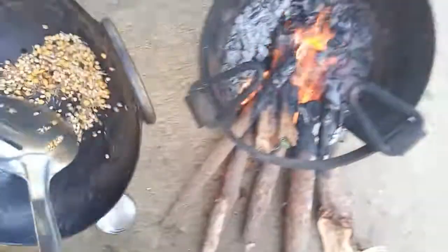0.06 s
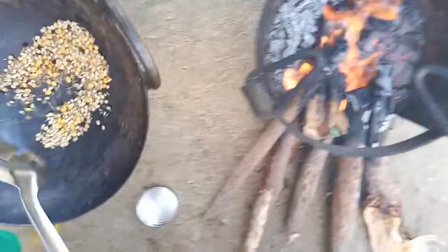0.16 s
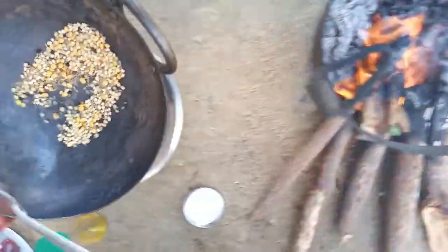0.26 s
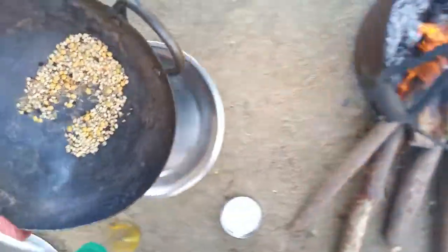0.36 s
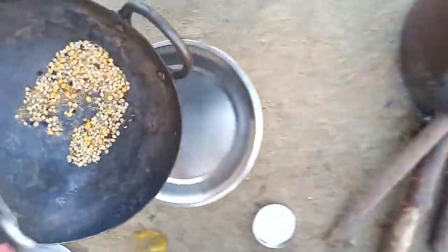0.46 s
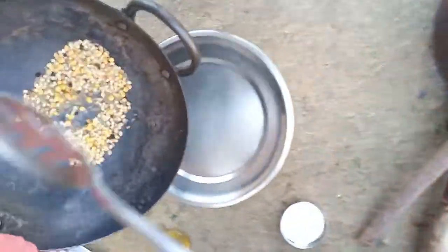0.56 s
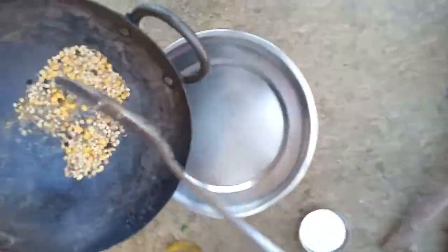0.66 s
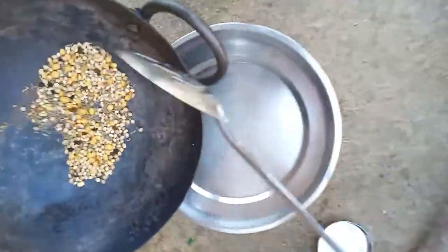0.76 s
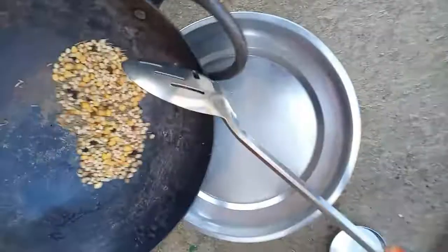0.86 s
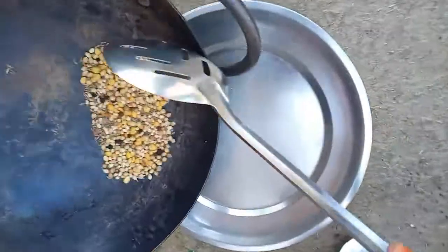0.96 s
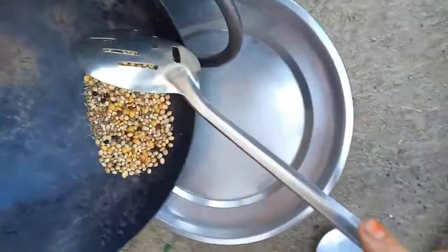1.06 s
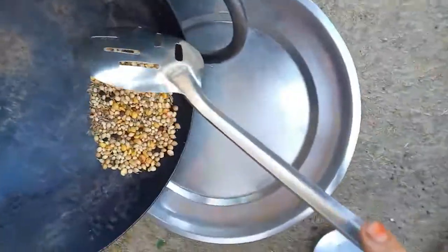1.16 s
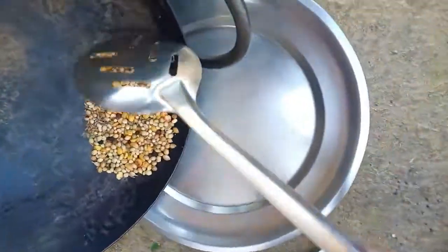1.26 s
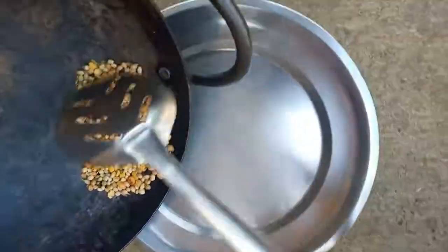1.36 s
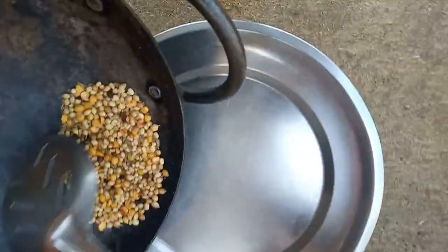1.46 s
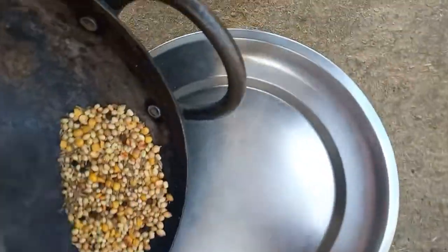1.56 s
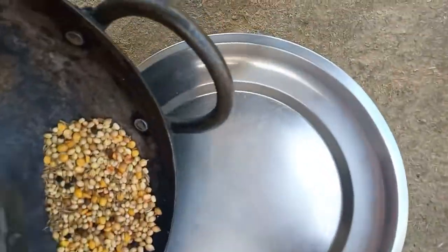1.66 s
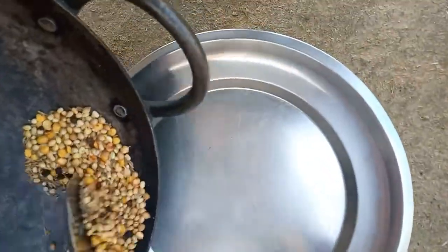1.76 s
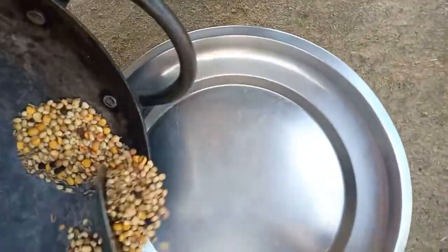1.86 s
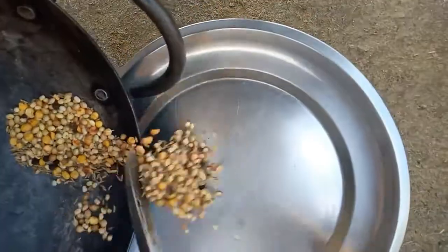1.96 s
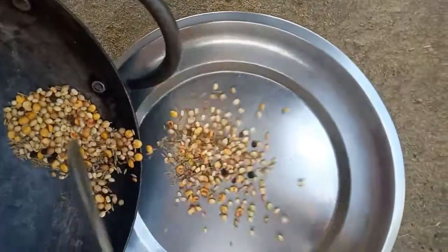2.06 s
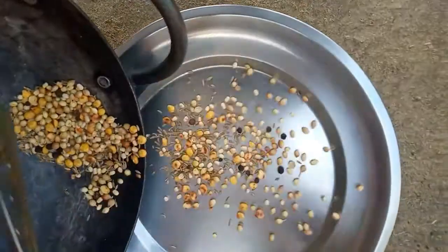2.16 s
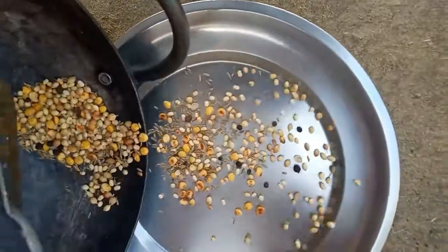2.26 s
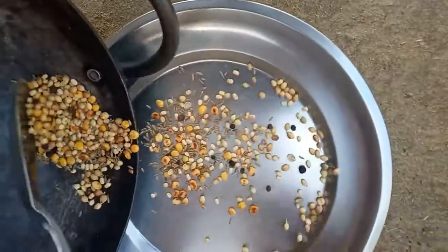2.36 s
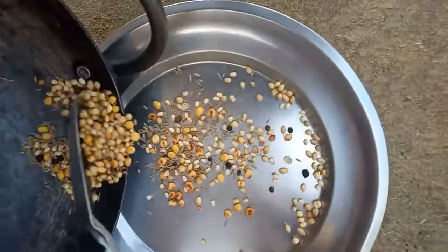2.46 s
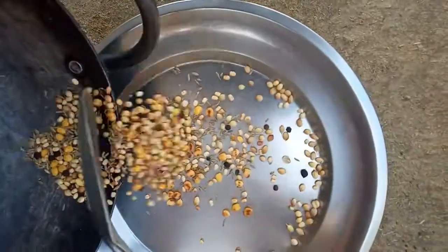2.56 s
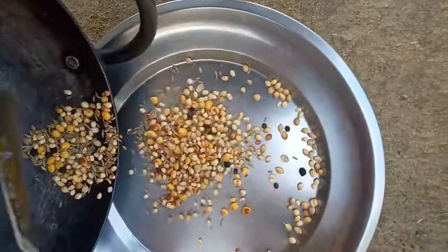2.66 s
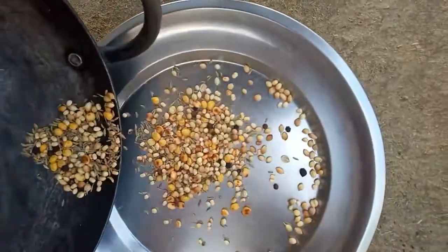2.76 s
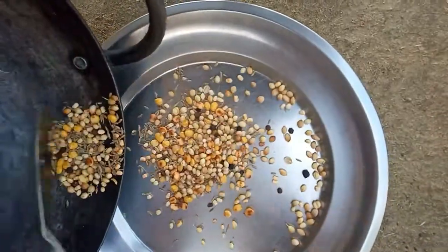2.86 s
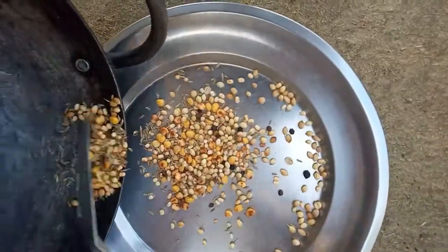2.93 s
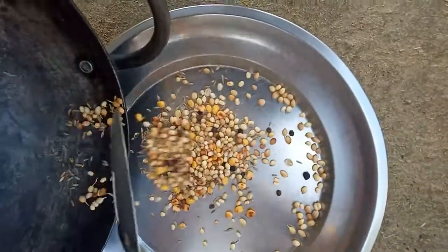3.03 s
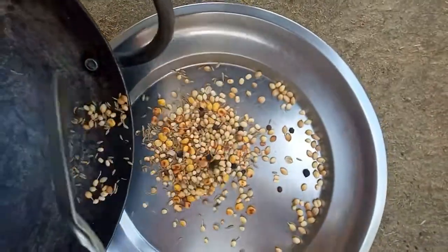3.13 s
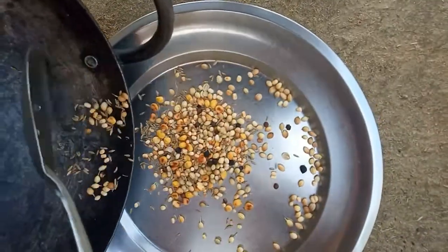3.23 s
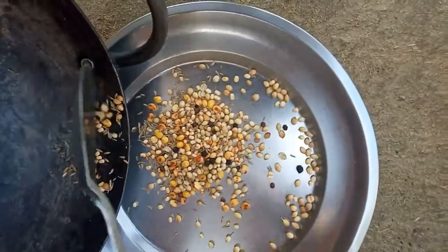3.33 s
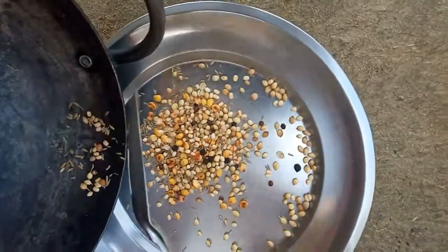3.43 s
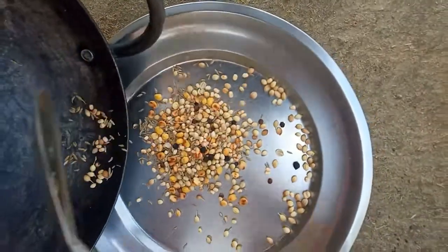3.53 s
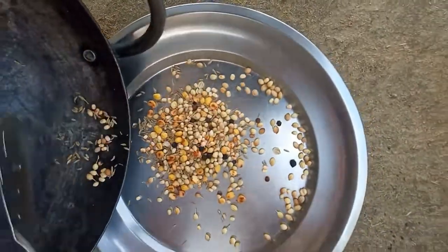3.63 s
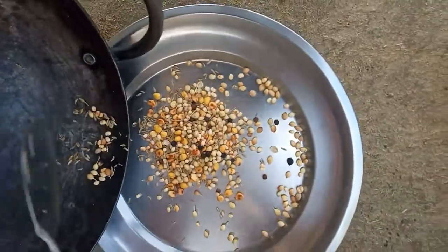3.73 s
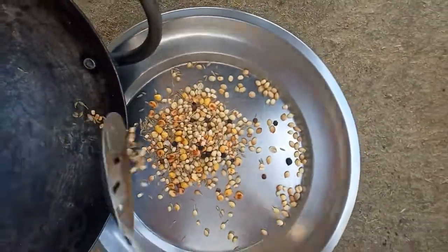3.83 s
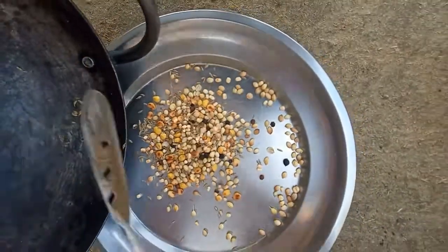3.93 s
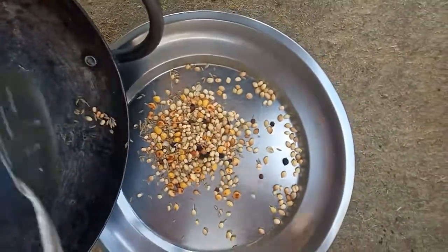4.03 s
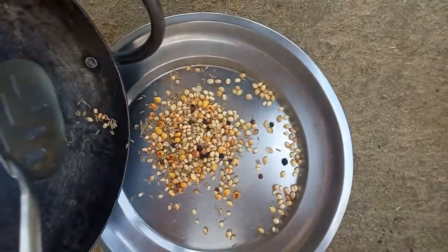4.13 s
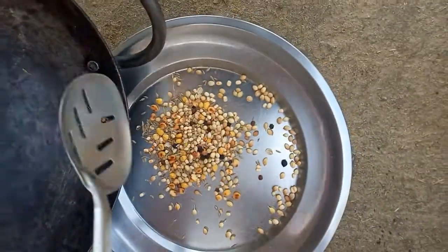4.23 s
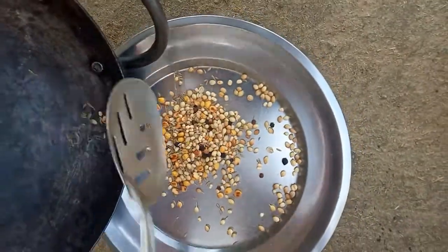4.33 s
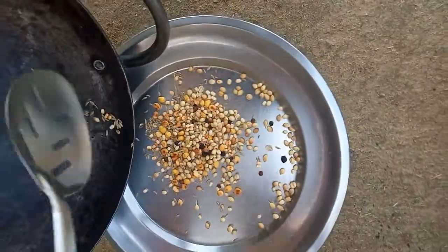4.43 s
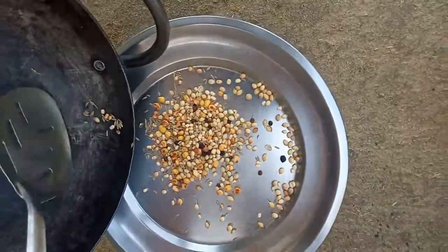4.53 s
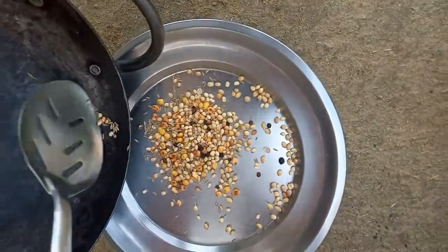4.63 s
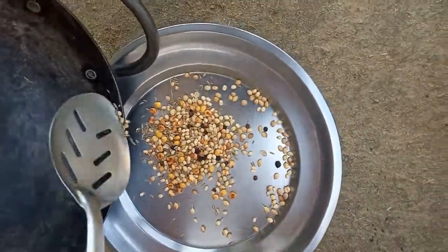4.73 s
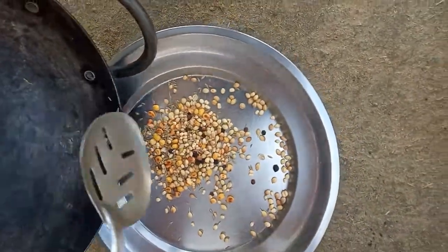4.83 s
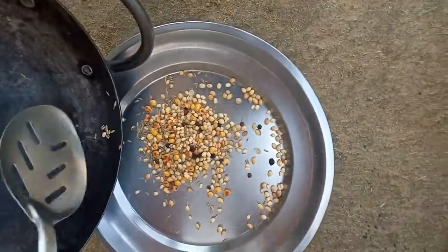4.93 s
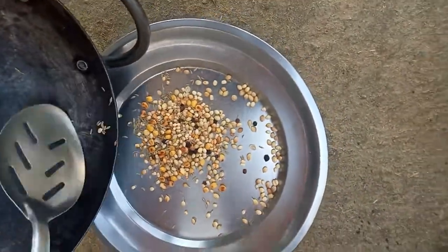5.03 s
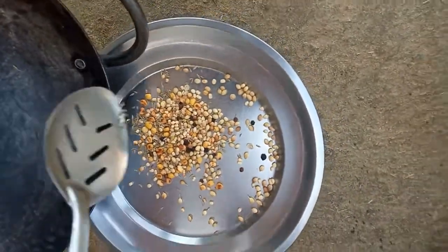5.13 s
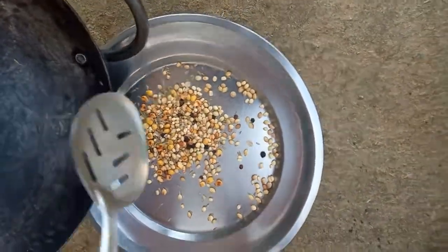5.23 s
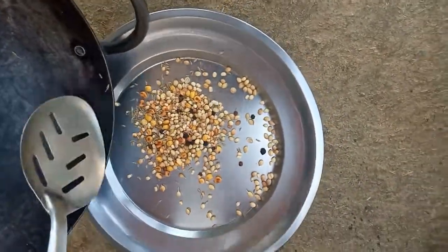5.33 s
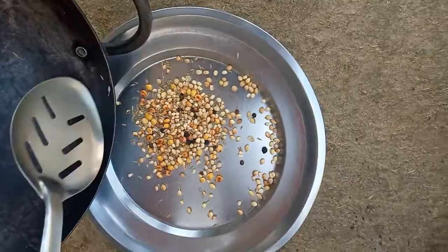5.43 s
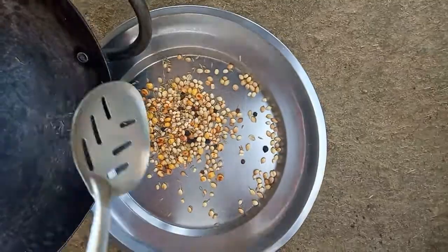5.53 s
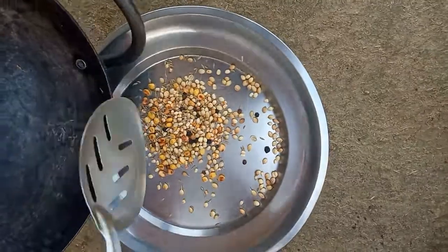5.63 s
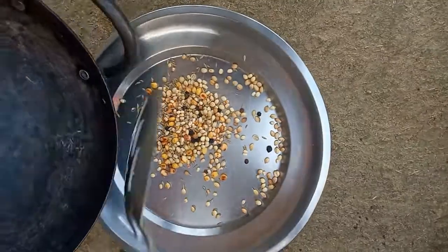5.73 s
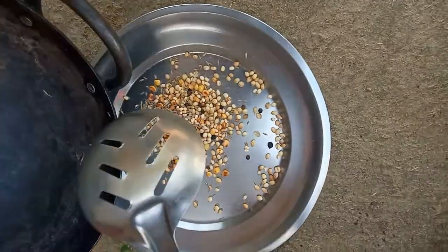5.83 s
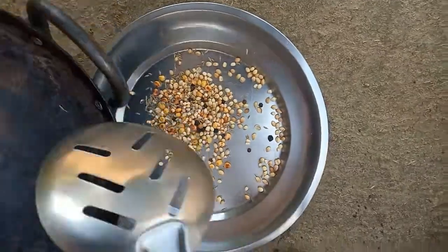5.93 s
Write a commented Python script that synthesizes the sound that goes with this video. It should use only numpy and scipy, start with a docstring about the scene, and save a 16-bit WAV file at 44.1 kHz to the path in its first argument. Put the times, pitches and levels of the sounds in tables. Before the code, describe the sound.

Soft seed sliding, then repeated metallic clanks and rising scrapes of a steel spatula on an iron pan, with seeds showering onto steel.

```python
"""First, seeds slide softly about in a tilted iron pan outdoors, over quiet air, and single seeds tick.
Then a slotted steel spatula pushes the roasted seeds into a steel plate, stroke after stroke.
In a full stroke the blade clatters down, scrapes and judders towards the rim, then leaves it and rings.
Random tiny impacts drive resonances for scrapes and seeds; decaying sine waves make the free ringing.
A few showers of seeds patter into the plate; other seeds shift in the pan after the strokes."""
import sys
import numpy as np
from scipy import signal
from scipy.fft import rfft, irfft
from scipy.io import wavfile
from scipy.ndimage import uniform_filter1d, map_coordinates

SR = 44100
rng = np.random.default_rng(int(sys.argv[2]) if len(sys.argv) > 2 else 0)


def unload_audio(sound):
    """Save the sound as a 16-bit wav file, at the path given as the first command line argument."""
    columns = np.transpose(np.atleast_2d(sound))
    # keep every value between -1 and 1, then stretch to whole-number steps
    steps = np.round(np.clip(columns, -1, 1) * 32767)
    wavfile.write(sys.argv[1], SR, steps.astype(np.int16))


N = 264159
TIME = np.arange(N) / SR  # [s]

# Levels in the tables are settings; the functions add fixed trims to some of them.
# The blade lands: (time [s], clatter length [s], pan thud [dB], pan knock [dB], judder [dB], crack [dB],
#   low tone [dB], high tone [dB], overtones [dB], overtone tilt [dB per octave])
STRIKES = [(1.543, 0.0084, -29, -23.5, -31, -29, -35, -25, -28, -16.5),
           (2.335, .0026, -26.5, -29, -24, -29, -21.5, -32, -31.5, -3.5),
           (2.7945, 0.0054, -23, -21.5, -20, -32, -19.5, -31.5, -31.5, -3.5),
           (3.2421, 0.0065, -20.5, -26, -30, -26.5, -27, -18.5, -32.5, -9),
           (3.684, 0.012, -23, -16, -17.5, -20.5, -24.5, -25.5, -29.5, -4.5),
           (4.116, 0.0088, -28.5, -20, -22, -33, -32, -28, -27, -4),
           (4.5509, .013, -28.5, -25, -17, -26, -33.5, -24, -34, 3.5),
           (4.989, 0.017, -25.5, -25, -16, -26.5, -33.5, -29.5, -38.5, 10),
           (5.3572, 0.01, -47.5, -37, -13, -27, -30, -40, -35, -8)]
# The blade skips off or leaves the iron and rings freely:
#   (time [s], low tone [dB], high tone [dB], overtones [dB], overtone tilt [dB per octave])
LIFTOFFS = [(0.738, -43, -59, -64, -17), (1.138, -73, -59, -59, 13), (1.72, -31, -26, -34, 4.5),
            (2.407, -31.5, -38, -35.5, 3), (2.953, -46, -42, -46.5, 8), (3.406, -47, -42, -43, 4),
            (3.867, -33, -38, -41.5, 6), (4.291, -47.5, -43, -43.5, -1.5), (4.768, -32.5, -44, -47, -1.5),
            (5.14, -48.5, -58.5, -42, 1.5), (5.502, -28.5, -52, -39, 1.5)]
# A push, lasting until the next lift-off: (start [s], hardest moment [share of the push], hiss [dB],
#   rumble [dB], judder at start [dB], judder at end [dB], judder pitch at start [Hz],
#   song at start [dB], song at end [dB], song's sag midway [dB], flick at the rim [dB])
SCRAPES = [(0.854, 0.37, -45, -56, -25, -70, 1596, -22, -45.5, -1, -61),
           (1.563, 0.69, -40.5, -33.5, -46, -47, 1779, -15.5, -11, 2, -40),
           (2.354, 0.55, -39, -31.5, -31, -22, 1689, -21, -11.5, -3.5, -38),
           (2.815, 0.15, -36, -33.5, -19, -30, 1566, -17.5, -22.5, -7, -34.5),
           (3.266, 0.66, -29, -35.5, -37, -12.5, 1557, -13.5, -14.5, 2, -48),
           (3.711, 0.54, -30.5, -34, -35, -17.5, 1613, -15.5, -11, 5.5, -40),
           (4.142, 0.52, -27, -35.5, -42, -13, 1552, -25, -17, 5, -36),
           (4.576, 0.4, -30.5, -36, -31.5, -15, 1501, -22, -16, 6, -34),
           (5.021, 0.67, -29.5, -43.5, -42, -11.5, 1774, -24, -17, 5, -31),
           (5.384, 0.91, -33, -44.5, -38, -8.5, 1786, -33, -9, 7.5, -45)]
# Light touches of the blade: (time [s], level [dB])
TOUCHES = [(0.8443, -23), (0.854, -32), (1.3752, -39.5), (2.28, -27.5)]
# The pan's rim sings on after the blade slips off it: (time [s], level [dB])
RIM_SLIPS = [(3.406, -43), (3.869, -38.5), (4.768, -56), (5.143, -49.5), (5.505, -54)]
# Seeds pour into the plate:
#   (time [s], rise [s], hold [s], fall [dB per s], clicks [dB], plate ring relative to clicks [dB])
SHOWERS = [(1.891, 0.069, 0.043, 101, -19.5, 5.5), (2.502, 0.13, 0.023, 193, -24, -12),
           (3.045, 0.022, 0.034, 249, -33, -30)]
# Seeds slide in the tilted pan: (time [s], rise [s], hold [s], fall [dB per s], level [dB])
SLIDES = [(0, 0.0013, 0.18, 48, -37), (0.44, 0.32, 0.091, 250, -37), (1.187, 0.2, 0.23, 300, -42.5),
          (2.275, 0.0067, 0.0078, 399.5, -37)]
# Stray single seeds: (time [s], level [dB])
STRAYS = [(0.0683, -41), (0.3935, -43), (1.2524, -44), (1.908, -13), (2.1239, -15.5), (2.541, -18),
          (2.719, -23), (3.185, -30.5), (3.9238, -25.5), (3.9479, -21), (4.897, -37), (5.2317, -25),
          (5.633, -38)]
# One dry knock close to the microphone: (time [s], level [dB])
KNOCK = (.5122, -23)

# Tones of the spatula in six families; t60 is the time to fade by 60 dB when undamped:
#   (frequency [Hz], level [dB], t60 [s])
SPATULA_MODES = [
    [(2575, 0, .25)],
    [(2800, -9, .1), (2919, 1.5, .19), (3160, 2.5, .19), (3185, -3, .14), (3262, -8, .1)],
    [(3505, -6.5, 0.082), (3830, 1, 0.4), (3617, 4, 0.13), (3800, -8, 0.51)],
    [(4020, 0, .3), (4072, -12, .3), (4127, -9, .14)],
    [(4298, -9, .22), (4465, 0, .16), (4587, -1, .17), (4727, -7, .12), (4918, -5, .15), (5108, -8, .2),
     (5303, -8, .22), (5368, -5, .17)],
    [(6130, -5.5, .12), (6690, -0.5, 0.25), (7155, -4.5, 0.094), (7430, -4.5, 0.13), (7600, -2.5, .25),
     (7600, -9, 0.14), (7700, -9.5, 0.14), (8060, -1.5, 0.23), (8440, -13, 0.086), (9340, -11.5, .13)],
]
# Long-lived tones of the pan's rim: (frequency [Hz], level [dB], t60 [s])
RIM_MODES = [(1249, -14, .6), (1782, -12, .9), (3590, -1, .8), (7572, 0, .7), (8158, -14, .8)]
# Resonances of the iron pan: (frequency [Hz], width [Hz], level [dB])
PAN_MODES = [(291, 53, 0), (359, 65, 1), (445, 60, 2), (521, 40, 4), (614, 65, 1.5), (676, 78, 0.5),
             (790, 157, 2), (972, 210, -0.5)]
# The whole pan rocking in the hand, and its wall: (frequency [Hz], width [Hz], level [dB])
PAN_ROCK_MODES = [(76.8, 122, 1.5), (145, 109, 6), (200, 110, -5)]
# The bowl of the pan under sliding seeds: (frequency [Hz], width [Hz], level [dB])
BOWL_MODES = [(2940, 55, -1), (3146, 33, 8), (3580, 29, 3.5), (3870, 41, 3), (4580, 130, 2.5)]
# Resonances of the steel plate: (frequency [Hz], width [Hz], level [dB])
PLATE_MODES = [(1090, 28, -2), (1500, 60, -7), (1783, 36, 2), (2120, 27, -1), (2660, 50, -10),
               (3180, 27, -2), (3698, 28, 0), (3832, 15, -2), (3960, 20, -7), (4390, 37, -5),
               (5030, 34, -9)]

# Colours, meaning how strong each pitch region is: (frequency [Hz], level [dB])
# Crack of the blade landing: (frequency [Hz], level [dB])
CRACK_COLOUR = [(300, -3.5), (1000, 6), (2200, 4), (3600, -13), (5000, -23), (6000, -13), (7600, -13),
                (9200, -27.5), (14500, -23), (16000, -24.5)]
# Hiss of the scraping edge: (frequency [Hz], level [dB])
FRICTION_COLOUR = [(300, 14), (1200, 1.5), (2200, 7), (4500, 3.5), (6000, 0.5), (7600, 10), (8400, -1.5),
                   (9500, -9), (12000, -9), (15000, -13.5), (16000, -52)]
# Seeds clicking on steel: (frequency [Hz], level [dB])
PATTER_COLOUR = [(120, -18), (200, -11.5), (340, -2.5), (916, -4.5), (1080, -3), (1180, -16), (1810, 1.5),
                 (2020, -23), (2130, -12), (2510, -14), (3830, -11), (5230, -12.5), (5630, -27),
                 (7680, -20.5), (16000, -58)]
# The hardest kernels ticking: (frequency [Hz], level [dB])
TICK_COLOUR = [(1500, 5), (4000, 5), (6000, -5.5), (8000, -4), (10000, -17.5), (14500, -7.5), (16000, -23)]
# Seeds sliding in the pan: (frequency [Hz], level [dB])
SLIDE_COLOUR = [(300, -7), (1500, -23), (2500, 1), (3200, 4), (4000, 9), (5000, -6), (5800, -14),
                (7500, -13.5), (9500, -27.5), (15000, -51)]
# Seeds shifting after a stroke: (frequency [Hz], level [dB])
RUSTLE_COLOUR = [(200, -5.5), (500, -21), (1800, 8.5), (4600, 3.5), (6000, -8.5), (7600, -2), (9500, -13.5),
                 (15000, -13)]
# Quiet outdoor air: (frequency [Hz], level [dB])
AIR_COLOUR = [(15, -60), (25, -15.5), (161, 0), (256, -6), (309, -9), (451, -9), (607, -10), (796, -12.5),
              (1160, -14.5), (1440, -13.5), (1650, -14.5), (2000, -14.5), (2160, -18.5), (3620, -23.5),
              (16000, -87)]

# Balance of the four overtone families, low to high, when struck: (level [dB])
STRUCK_BALANCE_DB = [-1, 0.5, 3, -3]
# The same balance when ringing freely: (level [dB])
FREE_BALANCE_DB = [2, -2.5, -5, -13.5]

# Friction swells and ebbs around the hardest moment: width [share of the push] and depth [dB]
HISS_WIDTH, HISS_DEPTH_DB = 0.25, 17
RUMBLE_WIDTH, RUMBLE_DEPTH_DB = 0.56, 13.5
JUDDER_BULGE_DB = 5  # extra judder midway
RIM_JUDDER_HZ, GLIDE_POWER = 1541, 2.4  # pitch at the rim; a higher power glides later
FLICK_S, FLICK_JUDDER_DB = 0.0063, 18.5  # the edge drags over the rim: fade time, extra judder
BITE_S, LET_GO_S = 0.015, 0.0061  # the edge takes hold and lets go
SETTLE_DB, EMPTYING_DB_PER_S = -43.5, 8.5  # seeds shift more faintly as the pan empties
SETTLE_RISE_S, SETTLE_HOLD_S, SETTLE_FALL_DB_PER_S = 0.01, 0.12, 74.5
TICKS_PER_S, TICKS_DB = 630, -10.5
AIR_DB = -46
CUTOFF_HZ = 15900


def scrapes():
    """The edge catches on rough iron; the catches hiss, rumble in the pan and sing in the blade."""
    hiss_gain, rumble_gain, judder_gain, song_gain = pushes()
    catches = evened(grains(2200, spread_db=4.5), span_s=0.058)

    rasp = gliding(metallic(catches, t60_s=0.11, ring_db=6, count=60), follow=.25)
    hiss = rms_one(tinted(rasp, FRICTION_COLOUR)) * from_db(5.5) * hiss_gain

    pan_sound = resonate(catches, PAN_MODES + PAN_ROCK_MODES)
    rumble_colour = [(60, -8.0), (250, -10), (500, 0.5), (1100, -3.5), (2500, 14.0)]
    rumble = evened(tinted(pan_sound, rumble_colour), span_s=0.016)
    rumble = rumble * from_db(1.66) * rumble_gain

    chatter = rms_one(gliding(resonate(catches, [(1925, 150, 0)]), follow=.5))
    shake = judder(width_hz=180, slips_per_s=1400) * from_db(-6.5) + from_db(-15) * chatter
    shake = shake * judder_gain * grip(rate_hz=30, depth_db=4.5)

    grind_colour = [(900, 4.5), (2200, 8), (3200, -5.5), (4500, -6.0), (5800, 5), (9000, -45.5)]
    grind = rms_one(tinted(rasp, grind_colour))
    song = from_db(-6.5) * blade_song(catches, contact_hz=5.7) + from_db(-20) * grind
    song = song * song_gain

    out = (hiss + rumble + shake + song) * grip(rate_hz=22, depth_db=3.0)
    for s, *ring_db in LIFTOFFS:
        levels = family_levels(FREE_BALANCE_DB, *ring_db)
        add(out, s, spatula_ring(levels, rise_s=0.01, damping=1.0))
    return out


def pushes():
    """Gains of hiss, rumble, judder and song: friction peaks with pressure and a flick ends each push."""
    gains = np.zeros((4, N))
    for (s, crest, hiss_db, rumble_db, judder_from, judder_to, _,
         song_from, song_to, sag_db, flick_db) in SCRAPES:
        end = next_liftoff(s)
        near = (TIME > s - .1) & (TIME < end + .1)
        t = TIME[near]
        way = np.clip((t - s) / (end - s), 0, 1)  # 0 at the start, 1 at lift-off
        midway = np.sin(np.pi * way)

        bite = np.clip(1 + (t - s) / BITE_S, 0, 1)
        contact = bite * np.exp(-np.maximum(t - end, 0) / LET_GO_S)
        flick = from_db(flick_db) * np.exp(-np.abs(t - end) / FLICK_S)

        hiss = from_db(hiss_db + arch(way - crest, HISS_WIDTH, HISS_DEPTH_DB))
        rumble = from_db(rumble_db + arch(way - crest, RUMBLE_WIDTH, RUMBLE_DEPTH_DB))
        shake = from_db(judder_from + (judder_to - judder_from) * way + JUDDER_BULGE_DB * midway)
        song = from_db(song_from + (song_to - song_from) * way - sag_db * midway)

        hiss_gain = np.hypot(contact * hiss, flick)
        judder_gain = np.hypot(contact * shake, from_db(FLICK_JUDDER_DB) * flick)
        gains[:, near] += [hiss_gain, contact * rumble, judder_gain, contact * song]
    return gains


def judder(width_hz, slips_per_s):
    """Uneven slips shake the pressed blade around its gliding pitch."""
    slips = grains(slips_per_s, spread_db=-7.5) * np.exp(2j * np.pi * rng.random(N))
    swing = signal.sosfilt(signal.butter(2, width_hz / 2, fs=SR, output="sos"), slips)
    carrier = np.exp(2j * np.pi * np.cumsum(bearing_hz()) / SR)
    return evened(np.real(swing * carrier), span_s=.02)


def bearing_hz():
    """Pitch of the pressed blade, which glides to the same value at the rim in every push."""
    way = np.linspace(0, 1, 12)
    times = [s + way * (next_liftoff(s) - s) for s, *_ in SCRAPES]
    start_hz = np.array(SCRAPES)[:, 6]
    pitches = [hz + (RIM_JUDDER_HZ - hz) * way ** GLIDE_POWER for hz in start_hz]
    return np.interp(TIME, np.ravel(times), np.ravel(pitches))


def gliding(x, follow):
    """Vary the playing speed so that resonances rise and fall with the pitch of the pressed blade."""
    speed = (bearing_hz() / np.mean(bearing_hz())) ** follow
    return map_coordinates(x, [np.cumsum(speed)], order=3, mode="mirror")


def grip(rate_hz, depth_db):
    """The edge grips and slips unevenly: a randomly wavering gain."""
    slow = signal.sosfilt(signal.butter(2, rate_hz, fs=SR, output="sos"), rng.standard_normal(N))
    return from_db(depth_db * np.tanh(rms_one(slow)))


def blade_song(catches, contact_hz):
    """Iron widens the blade's resonances; their balance shifts as it travels from landing to lift-off."""
    landings = [[s, *family_levels(STRUCK_BALANCE_DB, low, high, overtones, tilt)]
                for s, *_, low, high, overtones, tilt in STRIKES]
    releases = [[s, *family_levels(FREE_BALANCE_DB, *ring_db)] for s, *ring_db in LIFTOFFS]
    poses = np.array(sorted(landings + releases))
    song = 0
    for modes, family_db in zip(SPATULA_MODES, poses.T[1:]):
        # a short ring means a wide resonance; contact widens it further
        pressed = [(hz, contact_hz + np.log(1000) / (np.pi * t60), db) for hz, db, t60 in modes]
        voice = evened(resonate(catches, pressed), span_s=0.034)
        song = song + voice * from_db(np.interp(TIME, poses[:, 0], family_db))
    return evened(song, span_s=0.039)


def strikes():
    """Each landing thuds in the pan, cracks at the contact and rings the blade, which the iron damps."""
    out = np.zeros(N)
    for s, length_s, thud_db, knock_db, judder_db, crack_db, *ring_db in STRIKES:
        force = clatter(length_s, rebound_db=-15.5, grit_db=-31.0)
        add(out, s, burst(resonate(force, PAN_ROCK_MODES, scatter_db=2.5), thud_db))
        add(out, s, burst(resonate(force, PAN_MODES, scatter_db=4.0), knock_db))
        add(out, s, burst(resonate(force, [(1505, 72, 0), (1785, 135, 0)]), judder_db - 4.5))
        crack = tinted(metallic(force, t60_s=0.056, ring_db=-1), CRACK_COLOUR)
        add(out, s, burst(crack, crack_db + 6.0))
        levels = family_levels(STRUCK_BALANCE_DB, *ring_db)
        add(out, s, from_db(-3.0) * spatula_ring(levels, rise_s=0.0021, damping=1.233))
    for s, db in TOUCHES:
        force = clatter(0.0093, rebound_db=-17, grit_db=-43)
        crack = tinted(metallic(force, t60_s=0.12, ring_db=4), CRACK_COLOUR)
        add(out, s, burst(crack, db - 12.5))
        levels = [-19.5, -30, -27.5, -46, -22, -27.5]
        add(out, s, from_db(db) * spatula_ring(levels, rise_s=0.0035, damping=1.4))
    return out


def clatter(length_s, rebound_db, grit_db, count=5, size=6000):
    """The blade lands, rebounds a few times and crushes grit in between."""
    t = TIME[:size]
    force = from_db(grit_db) * rng.standard_normal(size) * np.exp(-t / length_s)
    jitter = rng.uniform(-0.22, 0.34, count - 1)
    when = length_s * (np.arange(1, count) + jitter) / (count - 1)
    rebounds = from_db(rebound_db * when / length_s) * rng.choice([-1, 1], count - 1)
    force[0] += 1
    force[(when * SR).astype(int)] += rebounds
    return force


def spatula_ring(family_db, rise_s, damping):
    """Ringing of the blade as fading sine waves; family levels apply 30 ms after the start."""
    t = TIME[:SR * 3 // 4]
    out = np.zeros(len(t))
    for modes, level_db in zip(SPATULA_MODES, family_db):
        hz, db, t60 = np.transpose(modes)[:, :, None]
        share = from_db(db) / np.sqrt(np.sum(from_db(db) ** 2) / 2)
        decay = np.exp(-np.log(1000) * damping * (t - .03) / t60)
        tones = np.sin(2 * np.pi * (hz * t + rng.random(hz.shape)))
        out += from_db(level_db) * np.sum(share * decay * tones, axis=0)
    return out * np.minimum(t / rise_s, 1)


def family_levels(balance_db, low_db, high_db, overtones_db, tilt_db=0):
    """Levels of the blade's six families: two main tones, and overtones on a common slope."""
    centres = [np.mean(np.array(modes)[:, 0]) for modes in SPATULA_MODES]
    low, second, third, high, fifth, sixth = centres
    octaves = np.log2(np.array([second, third, fifth, sixth]) / high)
    second_db, third_db, fifth_db, sixth_db = overtones_db + np.array(balance_db) + tilt_db * octaves
    return [low_db, second_db, third_db, high_db, fifth_db, sixth_db]


def next_liftoff(s):
    """Time at which the blade next leaves the iron."""
    return min(row[0] for row in LIFTOFFS if row[0] > s)


def rim():
    """Faint, slowly dying tones of the iron."""
    out, t = np.zeros(N), TIME[:SR]
    hz, db, t60 = np.transpose(RIM_MODES)[:, :, None]
    for s, level_db in RIM_SLIPS:
        decay = np.exp(-np.log(1000) * t / t60)
        tones = from_db(level_db + db) * decay * np.sin(2 * np.pi * hz * t)
        add(out, s, tones.sum(axis=0))
    return out


def seeds():
    """Seeds strike steel in showers, slide and shift in the pan, or fall singly."""
    return showers() + sliding() + shifting() + stray_seeds()


def showers():
    """Many small impacts click on the steel and ring the plate; the hardest kernels tick."""
    hail = evened(grains(1300, spread_db=2.5), span_s=0.022)
    clicks = evened(tinted(metallic(hail, t60_s=0.11, ring_db=2.5), PATTER_COLOUR), span_s=0.12)
    kernels = metallic(grains(TICKS_PER_S, spread_db=5.5), t60_s=0.02, ring_db=12)
    ticks = evened(tinted(kernels, TICK_COLOUR), span_s=0.086)
    clicks = clicks + from_db(TICKS_DB) * ticks
    plate = evened(resonate(hail, PLATE_MODES), span_s=0.078)
    out = np.zeros(N)
    for *shape, db, ring_db in SHOWERS:
        mix = from_db(0.5) * clicks + from_db(ring_db - 3.5) * plate
        out += from_db(db) * swell(*shape) * mix
    return out


def sliding():
    """Rolling seeds make a dense run of tiny impacts that also sounds the bowl of the pan."""
    rolling = grains(2000, spread_db=0.5)
    bowl = rms_one(resonate(rolling, BOWL_MODES))
    slide = rms_one(tinted(rolling, SLIDE_COLOUR)) + from_db(-1) * bowl
    gain = sum(from_db(db) * swell(*shape) for *shape, db in SLIDES)
    return evened(slide, span_s=0.23) * from_db(-3.5) * gain


def shifting():
    """Seeds rustle as they settle after each stroke, more faintly each time."""
    rustle = evened(tinted(grains(2700, spread_db=-4.5), RUSTLE_COLOUR), span_s=0.0518)
    ends = [next_liftoff(s) for s, *_ in STRIKES]
    gain = 0
    for s in ends:
        level = from_db(SETTLE_DB - EMPTYING_DB_PER_S * (s - ends[0]))
        gain = gain + level * swell(s, SETTLE_RISE_S, SETTLE_HOLD_S, SETTLE_FALL_DB_PER_S)
    return rustle * from_db(3.5) * gain


def stray_seeds():
    """Single seeds: one short metallic click, repeated at different levels."""
    out = np.zeros(N)
    impact = signal.unit_impulse(SR // 8)
    one_seed = tinted(metallic(impact, t60_s=0.075, ring_db=2), PATTER_COLOUR)
    for s, db in STRAYS:
        add(out, s, burst(one_seed, db - 20))
    return out


def knock():
    """One dull pulse with a sharp edge."""
    out = np.zeros(N)
    s, db = KNOCK
    colour = [(25, -16), (90, 1), (250, -4), (800, -10.0), (2000, -20), (4700, -16.5),
              (5700, -36), (7000, -26), (9500, -46), (14000, -28)]
    pulse = -tinted(signal.unit_impulse(SR // 8), colour)
    add(out, s, burst(pulse, db - 6))
    return out


def quiet_air():
    """Steady noise, coloured like the quiet air of the yard."""
    return from_db(AIR_DB) * rms_one(tinted(rng.standard_normal(N), AIR_COLOUR))


def grains(per_s, spread_db):
    """Tiny impacts at random times, with randomly spread sizes and signs."""
    sizes = from_db(spread_db * np.minimum(rng.exponential(1, N), 4)) * rng.choice([-1, 1], N)
    hits = rng.random(N) < per_s / SR
    return rms_one(sizes * hits) + 1e-9 * rng.standard_normal(N)  # the trace of noise avoids pure silence


def metallic(x, t60_s, ring_db, count=110):
    """Add the crowd of short-lived high tones of a metal sheet."""
    t = TIME[:SR // 4]
    hz = 1000 + 14500 * (np.arange(count)[:, None] + rng.random((count, 1))) / count
    tones = np.sin(2 * np.pi * (hz * t + rng.random((count, 1)))).sum(axis=0)
    modes = tones * np.exp(-np.log(1000) * t / t60_s)
    ringing = signal.oaconvolve(x, modes / np.linalg.norm(modes))[:len(x)]
    return (x + from_db(ring_db) * ringing) / np.hypot(1, from_db(ring_db))


def resonate(x, modes, scatter_db=0):
    """Resonances side by side; the point of contact scatters their strengths."""
    out = 0
    for k, (hz, width_hz, db) in enumerate(modes):
        r = np.exp(-np.pi * width_hz / SR)
        strength = from_db(db + scatter_db * rng.standard_normal())
        gain = (-1) ** k * strength * (1 - r * r) / 2  # neighbours have opposite signs
        feedback = [1, -2 * r * np.cos(2 * np.pi * hz / SR), r * r]
        out = out + signal.lfilter([gain, 0, -gain], feedback, x)
    return out


def tinted(x, colour, size=2048):
    """Filter with the given colour that acts as early as it can (minimum phase)."""
    hz, db = np.transpose(colour)
    grid = np.maximum(np.arange(size // 2 + 1) * SR / size, 1)
    cepstrum = irfft(np.log(from_db(np.interp(np.log(grid), np.log(hz), db))))
    folded = np.r_[cepstrum[0], 2 * cepstrum[1:size // 2]]
    response = irfft(np.exp(rfft(folded, size)))
    return signal.oaconvolve(x, response)[:len(x)]


def swell(s, rise_s, hold_s, fall_db_per_s):
    """Gain that rises, holds and dies away."""
    fall_db = np.clip(fall_db_per_s * (TIME - s - rise_s - hold_s), 0, 150)
    return np.clip((TIME - s) / rise_s, 0, 1) * from_db(-fall_db)


def arch(offset, width, depth_db):
    """Bell-shaped rise and fall in dB, 0 at the top."""
    return depth_db * (np.exp(-(offset / width) ** 2) - 1)


def from_db(db):
    """Decibels to gain."""
    return 10 ** (np.asarray(db) / 20)


def rms_one(x):
    """Scale to an average strength (rms) of 1."""
    return x / np.sqrt(np.mean(np.abs(x) ** 2) + 1e-20)


def evened(x, span_s):
    """Even out the strength over every stretch of span_s; the faster grain stays."""
    power = uniform_filter1d(np.abs(x) ** 2, max(int(span_s * SR), 8))
    return x / np.sqrt(np.maximum(power, 1e-12))


def burst(x, db):
    """Scale a short sound so that its energy equals that level held for 30 ms."""
    return from_db(db) * x * np.sqrt(.03 * SR / np.sum(x ** 2))


def add(out, s, x):
    """Mix x in at time s."""
    start = round(s * SR)
    out[start:start + len(x)] += x[:N - start]


def scene():
    """Spatula, pan and seeds over the quiet air of the yard."""
    return (scrapes() + strikes() + rim() + seeds() + knock() + quiet_air())[None]


def record(dry):
    """The microphone loses the deepest bass, the hardest peaks are rounded and the top is cut."""
    thinned = signal.sosfilt(signal.butter(2, 42, "high", fs=SR, output="sos"), dry)
    rounded = thinned / (1 + (thinned / .88) ** 4) ** (1 / 4)
    return signal.sosfilt(signal.ellip(10, .2, 95, CUTOFF_HZ, fs=SR, output="sos"), rounded)


dry = scene()
out = record(dry)
unload_audio(out)
```